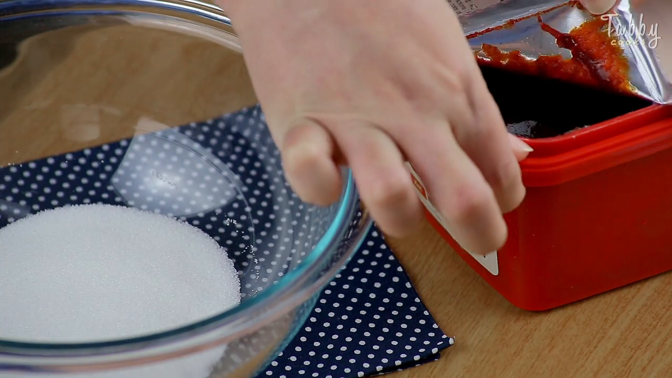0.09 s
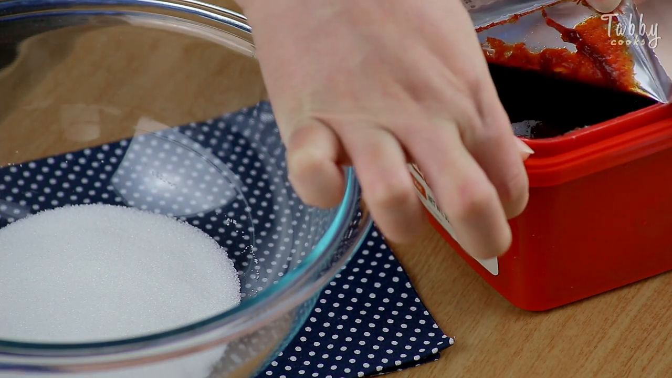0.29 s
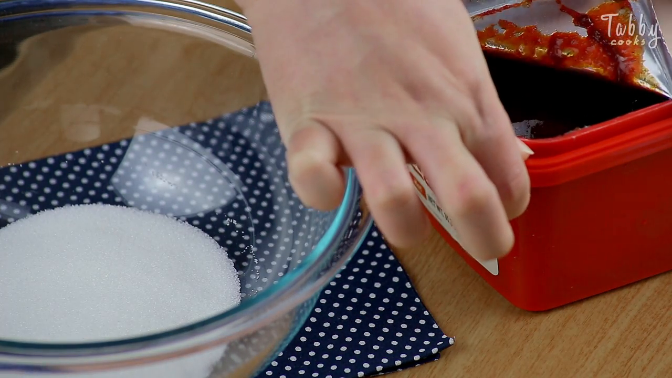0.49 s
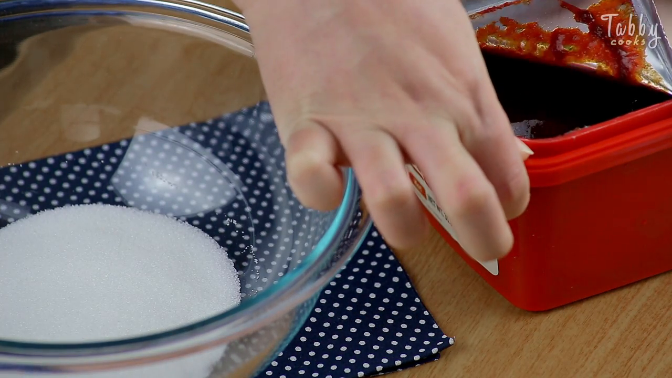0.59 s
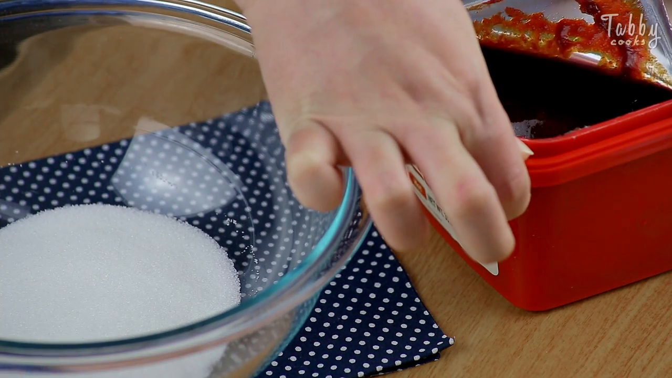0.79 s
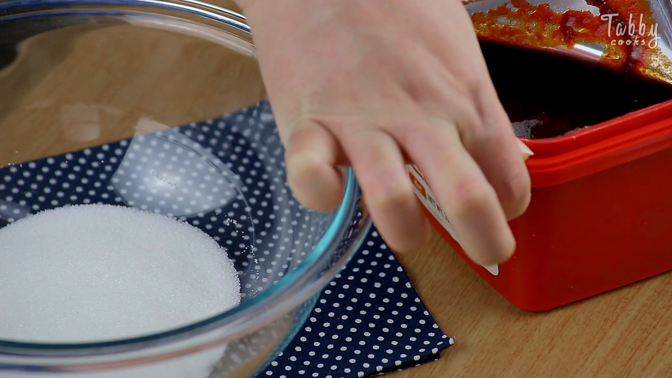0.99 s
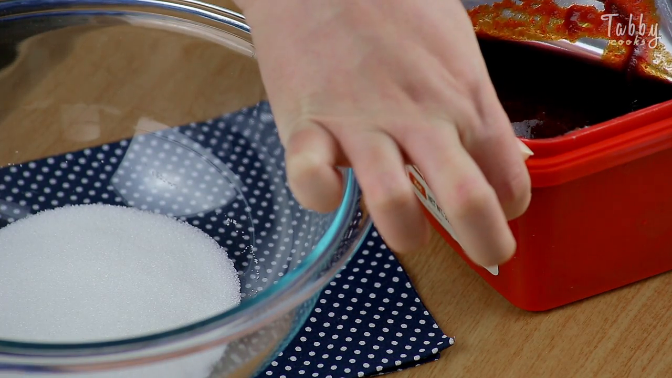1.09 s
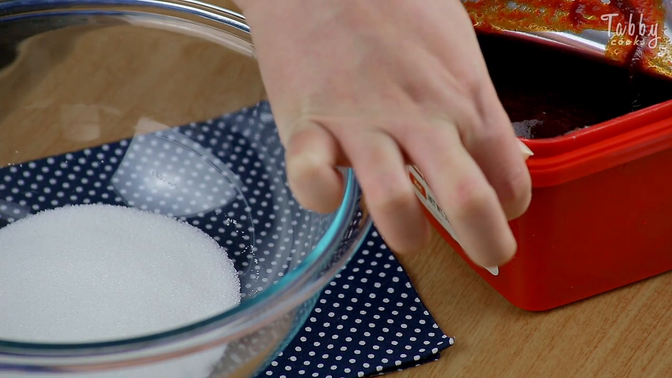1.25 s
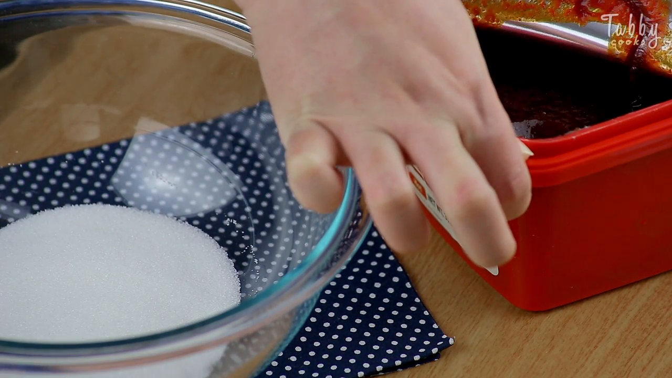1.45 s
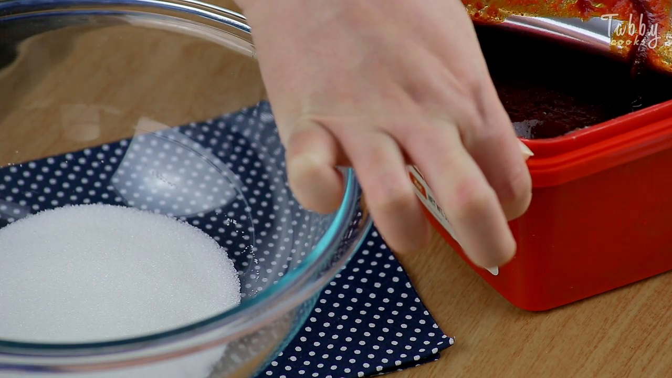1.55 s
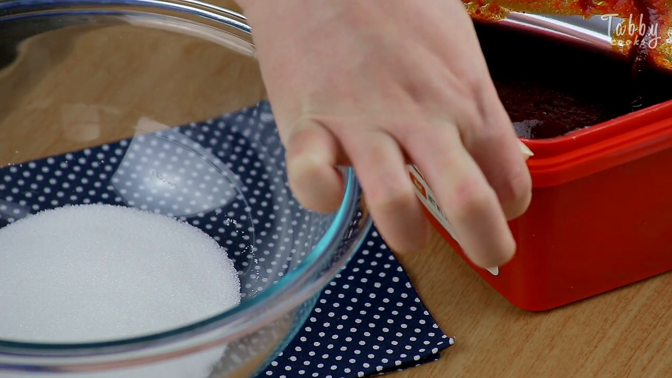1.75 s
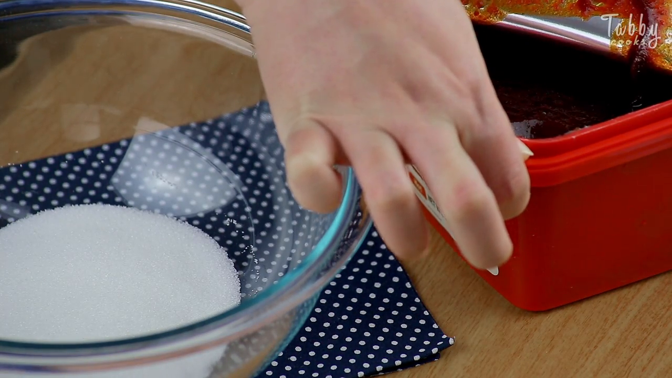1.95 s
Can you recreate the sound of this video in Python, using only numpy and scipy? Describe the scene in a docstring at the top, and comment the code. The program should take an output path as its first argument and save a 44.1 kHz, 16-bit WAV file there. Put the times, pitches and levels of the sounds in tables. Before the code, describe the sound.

A foil seal is peeled off a plastic tub in short crackling snaps, thumping the table

```python
"""Foil seal peeled off a plastic tub

A foil seal comes off in short pulls, close to a microphone on the same table. The glue lets go in sharp
snaps: noise jolts through resonances of tub, flap and foil. Dense random grains make the tearing.
Each pull shakes the table, which booms in three decaying low modes, and the tub's base knocks.
The table top echoes and a small kitchen answers the snaps briefly, over a faint hum of shaped noise."""
import sys
import numpy as np
from scipy import signal
from scipy.fft import rfft, irfft, next_fast_len
from scipy.io import wavfile

SR = 44100
rng = np.random.default_rng(int(sys.argv[2]) if len(sys.argv) > 2 else 0)


def materialize(psi):
    """Save the field psi as 16-bit PCM at rate SR to the path in sys.argv[1].

    A 1-D psi becomes a single channel; in a 2-D psi each row is a channel.
    """
    bounded = np.clip(np.atleast_2d(psi).T, -1, 1)
    quanta = np.round(bounded * 32767).astype(np.int16)
    wavfile.write(sys.argv[1], SR, quanta)


N = 88200

# steady floor, relative spectrum: (frequency [Hz], density [dB per Hz])
HUM_SPECTRUM = [(65, -35.5), (110, 14.5), (620, -25.5), (960, -20.5), (1910, -19.5), (2300, -16.5),
                (3280, -39.5), (16000, -56)]
HUM_DB = -59

# pulls that jolt the table: (time [s], slow mode [dB], middle mode [dB], upper mode [dB])
PULLS = [(0.253, -20, -35, -37), (.335, -48, -29, -28), (0.371, -13, -17.5, -29), (0.499, -16, -35.5, -42),
         (0.652, -12.5, -21, -37), (0.851, -16, -30, -50), (1.047, -8.5, -10.5, -29),
         (1.236, -11.5, -18.5, -32), (1.263, -25, -27, -40), (1.483, -11.5, -13.5, -33),
         (1.616, -27.5, -31, -42)]
# table modes, slow to upper: (frequency [Hz], T60 [s], rise [s])
TABLE_MODES = [(27.68, 0.6, 0.022), (71.06, .35, 0.02), (172.46, 0.32, 0.00063)]
# initial pitch excess of each table mode: (share of its frequency)
PITCH_EXCESS = [.05, .2, 0.0068]
SETTLE_S = 0.03
# trembling of the table: (frequency [Hz], width [Hz], level [dB])
TREMBLE_MODES = [(27, 8.3, -0.5), (60.4, 22.18, -8.5), (88.2, 17.4, -16.5), (173.9, 24, -29.5)]
REST_DB, STIRRED_DB = -39, -14.5  # trembling at rest; added after a pull, relative to its slow mode
KNOCK_HZ, KNOCK_T60_S, KNOCK_DB = 279, 0.066, -7.5  # tub base, level relative to the upper mode

# snaps of the seal: (time [s], tub boom [dB], flap ring [dB], flap pitch [Hz], foil crack [dB],
# foil fizz [dB])
SNAPS = [(0.203, -69, -42, 1740, -38, -39), (0.2322, -69, -50.5, 1790, -40.5, -41),
         (0.2512, -67, -42, 1870, -40.5, -43), (0.2588, -45.5, -41.5, 1790, -35.5, -41),
         (0.2838, -20, -20.5, 1670, -48.5, -54), (0.3392, -45, -32, 1790, -57, -38.5),
         (0.3422, -28.5, -27.5, 2030, -29, -51), (0.3654, -35, -30, 1340, -29, -33.5),
         (0.3842, -19, -19, 1600, -46, -50), (0.3851, -27, -20.5, 2495, -34, -44),
         (0.4363, -38, -50, 1170, -48, -56), (0.4436, -42, -44, 1990, -34, -35.5),
         (0.4544, -41.5, -39, 1580, -35, -35.5), (0.4757, -38, -29, 1370, -36, -42),
         (0.4923, -60, -41, 1710, -43, -47), (0.4968, -41, -33.5, 1880, -38, -70),
         (0.502, -53, -33.5, 1230, -50, -56), (0.5176, -48, -51, 1210, -36.5, -37),
         (0.5505, -61, -49, 1740, -66, -88), (0.6228, -54, -54, 2040, -41.5, -51),
         (0.6311, -78, -42, 2160, -35, -44), (0.6411, -38.5, -36.5, 2440, -26, -27.5),
         (0.653, -36.5, -53, 1370, -36, -44), (0.6745, -47.5, -42.5, 2230, -33.5, -34),
         (0.7934, -63, -32.5, 1296, -30.5, -76), (0.793, -60, -37.5, 2040, -32, -44.5),
         (0.8214, -71, -47, 1850, -36, -43), (0.8306, -72, -50, 1880, -36, -39),
         (0.8525, -45, -49, 1510, -35, -39.5), (0.8903, -61.5, -59, 1720, -38.5, -40.5),
         (0.955, -73, -52.5, 1720, -48.5, -58), (1.0043, -100, -51.5, 1960, -35.5, -40.5),
         (1.0265, -49, -42.5, 1610, -35.5, -35), (1.0397, -36.5, -42.5, 1330, -25.5, -27),
         (1.0433, -28.5, -35.5, 334, -40.5, -50.5), (1.0709, -41.5, -59, 2390, -36, -38.5),
         (1.0823, -40, -45.5, 1930, -29, -36), (1.0913, -48.5, -43, 1150, -35.5, -36),
         (1.159, -47, -34, 1810, -34, -37), (1.1799, -60, -52, 2020, -44, -46.5),
         (1.1892, -63, -42, 1280, -33.5, -36), (1.2158, -53.5, -25, 1485, -33, -39.5),
         (1.2309, -35.5, -33.5, 1930, -27, -29), (1.2438, -45.5, -43, 1204, -33, -40.5),
         (1.2803, -50, -43.5, 2400, -31, -36), (1.3187, -55.5, -50, 1200, -75.5, -69),
         (1.3806, -60, -74.5, 2430, -32.5, -38.5), (1.436, -72, -75.5, 2370, -41, -49),
         (1.4477, -55, -50, 2320, -46, -49), (1.4712, -43.5, -41, 2530, -29, -38),
         (1.476, -41.5, -54, 1130, -29, -30.5), (1.481, -32.5, -29.5, 1180, -28.5, -32.5),
         (1.5377, -50, -35, 1890, -35.5, -64), (1.5509, -63, -42, 1200, -40, -37.5),
         (1.5594, -59, -38, 1240, -29.5, -53.5), (1.5814, -74, -41, 2360, -35.5, -37),
         (1.6209, -61, -25.5, 1085, -34.5, -39.5), (1.6215, -58.5, -37, 591, -48, -58),
         (1.6216, -51, -27, 2440, -31, -63), (1.713, -52.5, -38, 2550, -30, -35.5),
         (1.7152, -58.5, -42, 1187, -56.5, -41), (1.9495, -50.5, -54, 1315, -86, -88.5)]
# tub resonances: (frequency [Hz], width [Hz], level [dB])
TUB_BOOM = [(300, 220, 2), (580, 350, -1), (950, 450, -1)]
# foil crack resonances: (frequency [Hz], width [Hz], level [dB])
FOIL_CRACK = [(3433, 433, -2.1), (4090, 750, 0.5), (6700, 2730, -0.33)]
# foil fizz resonances: (frequency [Hz], width [Hz], level [dB])
FOIL_FIZZ = [(8300, 11000, 4.9), (12600, 11000, -4.5)]
FLAP_Q = 5.9
# The next four hold one value per snap part: boom, ring, crack, fizz.
# direct decay of an unshortened snap: (T60 [s])
SNAP_T60_S = [0.0047, 0.015, 0.019, 0.016]
# first instant of the jolt, added to its noise: (amplitude [noise rms])
SPIKE = [40, 22, 7, 6]
# room tail: (level [dB])
ROOM_DB = [-8, -14.5, -17.5, -18.5]
# room tail decay: (T60 [s])
ROOM_T60_S = [0.13, 0.2, 0.19, 0.17]
ROOM_RISE_S = 0.0015
ECHO_S, ECHO_DB = 0.0043, -17  # table top's copy
ONSET = SR // 250  # 4 ms in samples, span of the snap level

# runs where the glue tears densely: (time [s], length [s], relative level [dB])
TEARS = [(.331, .007, -35.5), (0.39, 0.12, -43.5), (0.618, .014, -44), (0.642, .014, -29),
         (0.81, 0.091, -50.5), (1.04, .008, -27), (1.049, 0.055, -49), (1.152, 0.047, -54),
         (1.221, 0.038, -41.5), (1.478, .011, -28.5), (1.531, 0.075, -50)]
# grain colour, per snap part: (level [dB])
TEAR_PARTS_DB = [-8, 0.5, -1.5, -9.5]
TEAR_RATE_HZ, TEAR_SPREAD_DB = 2500, 4.5  # mean grain rate, mean of the exponential level scatter
TEAR_FLAP_HZ, TEAR_SHORTEN = 1600, 6.2  # middle flap pitch, divisor of direct T60

FADE_S, TOP_HZ = 0.008, 16300


def amp(db):
    """Decibels to amplitude."""
    return 10 ** (np.asarray(db) / 20)


def unit(x):
    """Scale to rms 1 along time."""
    return x / np.sqrt(np.mean(x ** 2, axis=-1, keepdims=True) + 1e-20)


def filtered(x, response):
    """Apply a complex response of frequency, zero-padded."""
    m = next_fast_len(x.shape[-1] + SR // 2)
    spectrum = rfft(x, m) * response(np.fft.rfftfreq(m, 1 / SR))
    return irfft(spectrum, m)[..., :x.shape[-1]]


def modes(rows):
    """Causal response of parallel resonances with alternating signs."""
    def response(f):
        total = 0
        for k, (hz, width, db) in enumerate(rows):
            resonance = 1j * f * width / (hz * hz - f * f + 1j * f * width)
            total = total + (-1) ** k * amp(db) * resonance
        return total
    return response


def steep(rows):
    """Resonances, cut steeply below the lowest and above the highest."""
    low_hz, high_hz = 0.86 * rows[0][0], 1.185 * rows[-1][0]

    def response(f):
        highpass = f * f / (low_hz ** 2 - f * f + 1.1j * f * low_hz)
        lowpass = high_hz ** 2 / (high_hz ** 2 - f * f + 1.1j * f * high_hz)
        return modes(rows)(f) * (highpass * lowpass) ** 2
    return response


def hum():
    """Kitchen floor: steady noise shaped by a spectrum interpolated over log frequency."""
    hz, db = np.transpose(HUM_SPECTRUM)

    def response(f):
        return amp(np.interp(np.log(f + 1), np.log(hz), db)) * (f > hz[0])
    return amp(HUM_DB) * unit(filtered(rng.standard_normal(N), response))


def table():
    """Pulls ring decaying modes that settle down in pitch, knock the tub's base and stir up trembling."""
    t = np.arange(N) / SR
    out, tremble_level = np.zeros(N), np.full(N, amp(REST_DB))
    for start, *levels_db in PULLS:
        u = np.maximum(t - start, 0)
        lead = SETTLE_S * (1 - np.exp(-u / SETTLE_S))  # integral of the decaying pitch excess
        knock_level = amp(levels_db[-1] + KNOCK_DB - 60 * u / KNOCK_T60_S)
        out += knock_level * np.sin(2 * np.pi * KNOCK_HZ * (u + PITCH_EXCESS[1] * lead))
        swells = []
        for (hz, t60, rise), db, excess in zip(TABLE_MODES, levels_db, PITCH_EXCESS):
            swell = amp(db - 60 * u / t60) * (1 - np.exp(-u / rise))
            out += swell * np.sin(2 * np.pi * hz * (u + excess * lead))
            swells.append(swell)
        tremble_level += amp(STIRRED_DB) * swells[0]
    tremble = unit(filtered(rng.standard_normal(N), modes(TREMBLE_MODES)))
    return out + tremble_level * tremble


def bodies(flap_hz):
    """Resonances of the four snap parts: tub boom, flap ring, foil crack, foil fizz."""
    return [TUB_BOOM, [(flap_hz, flap_hz / FLAP_Q, 0)], FOIL_CRACK, FOIL_FIZZ]


def snaps(flap_hz, shorten):
    """One noise jolt per snap through each body, with table echo and room tail: parts x snaps x time."""
    t = np.arange(SR // 4) / SR
    noise = rng.standard_normal((len(flap_hz), 2, len(t)))
    jolt, air = np.moveaxis(noise, 1, 0)
    parts = []
    settings = zip(bodies(flap_hz[:, None]), SPIKE, SNAP_T60_S, ROOM_DB, ROOM_T60_S)
    for body, spike, t60, room_db, room_t60 in settings:
        decay = amp(-60 * t * shorten / t60)
        direct = filtered((jolt + spike * (t == 0)) * decay, steep(body))
        # direct sound: rms 1 over the onset
        direct = direct / np.sqrt(np.mean(direct[:, :ONSET] ** 2, axis=1, keepdims=True))
        echo = np.pad(direct, ((0, 0), (round(ECHO_S * SR), 0)))[:, :len(t)]
        tail_level = amp(room_db - 60 * t / room_t60) * (1 - np.exp(-t / ROOM_RISE_S))
        tail = unit(filtered(air, steep(body))) * tail_level
        parts.append(direct + amp(ECHO_DB) * echo + tail)
    return np.array(parts)


def seal():
    """Glue snaps, each exciting tub, flap and foil at its own strengths."""
    start_s, boom, ring, flap_hz, crack, fizz = np.transpose(SNAPS)
    strengths = amp([boom, ring, crack, fizz])[..., None]
    sounds = np.sum(strengths * snaps(flap_hz, 1), axis=0)
    out = np.zeros(N + SR)
    for start, sound in zip(start_s, sounds):
        out[round(start * SR):][:len(sound)] += sound
    return out[:N]


def tearing():
    """Tiny random glue releases, dense during each run, in four shortened snap shapes."""
    t = np.arange(N) / SR
    level = sum(amp(db) * (t >= start) * (t < start + length) for start, length, db in TEARS)
    hits = rng.random(N) < TEAR_RATE_HZ / SR
    sizes = amp(TEAR_SPREAD_DB * rng.exponential(size=N))
    grains = level * unit(hits * sizes * rng.choice([-1, 1], N))
    flap_hz = TEAR_FLAP_HZ * np.exp(0.42 * np.linspace(-1, 1, num=4))
    shapes = np.tensordot(amp(TEAR_PARTS_DB), snaps(flap_hz, TEAR_SHORTEN), axes=1)
    chosen = rng.integers(len(shapes), size=N) == np.arange(len(shapes))[:, None]
    # rms over the onset to energy
    torn = signal.fftconvolve(grains * chosen, shapes / np.sqrt(ONSET), axes=1)
    return torn.sum(axis=0)[:N]


def scene():
    """Sum of all sources, one channel."""
    return (hum() + table() + seal() + tearing())[None]


def record(dry):
    """Linear fades at both ends, then a steep low-pass at TOP_HZ."""
    t = np.arange(N) / SR
    fade = np.minimum(1, np.minimum(t, t[::-1]) / FADE_S)
    return filtered(dry * fade, lambda hz: 1 / (1 + (hz / TOP_HZ) ** 80))


dry = scene()
out = record(dry)
materialize(out)
```